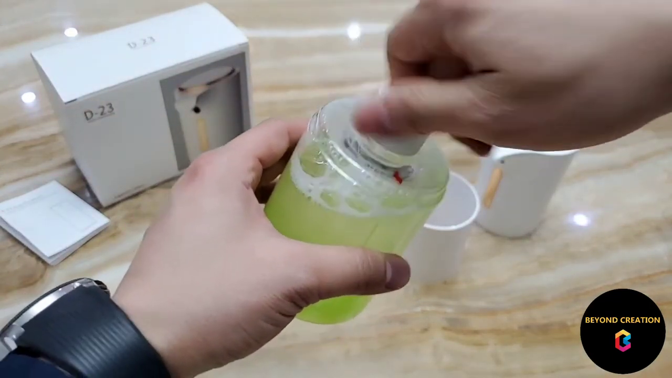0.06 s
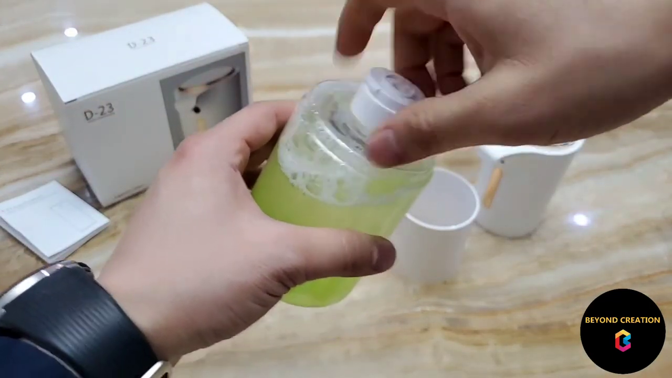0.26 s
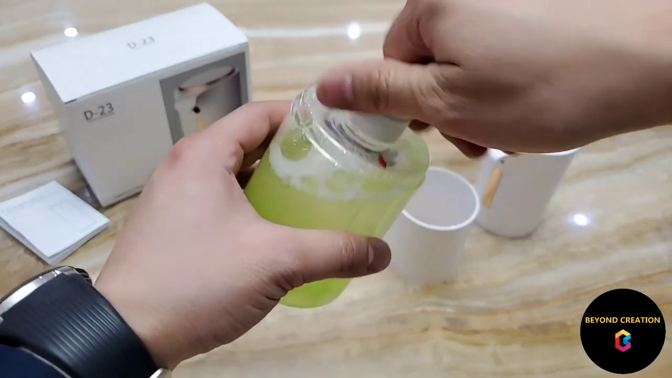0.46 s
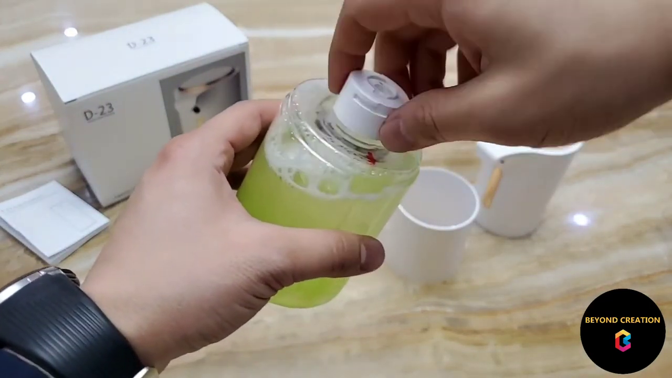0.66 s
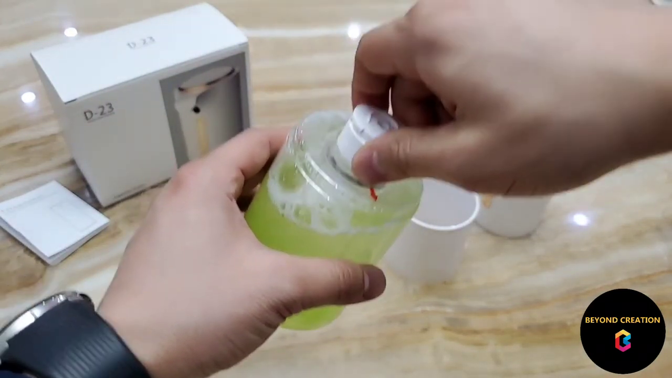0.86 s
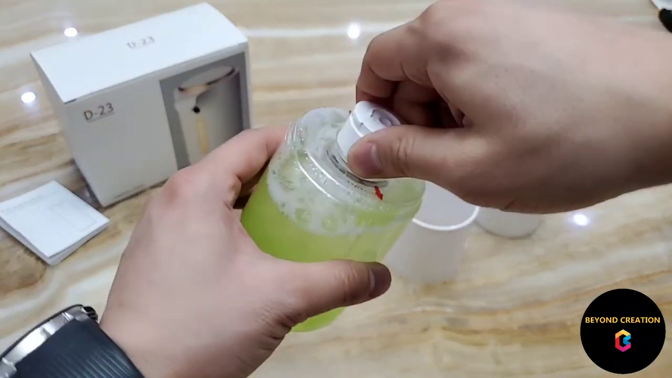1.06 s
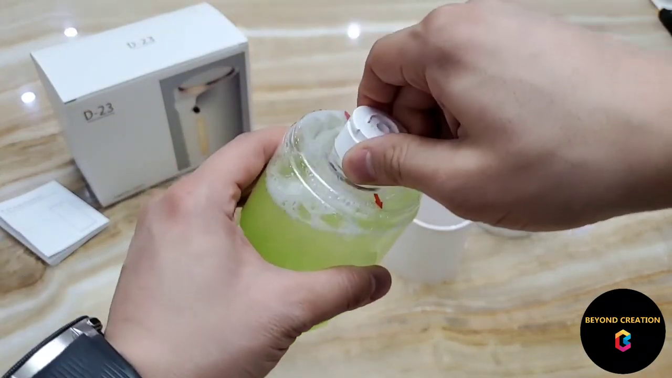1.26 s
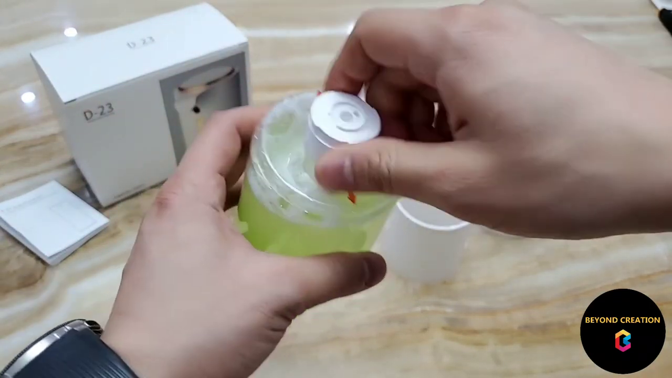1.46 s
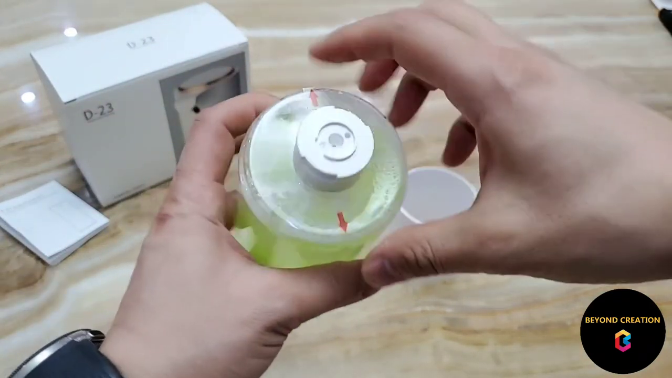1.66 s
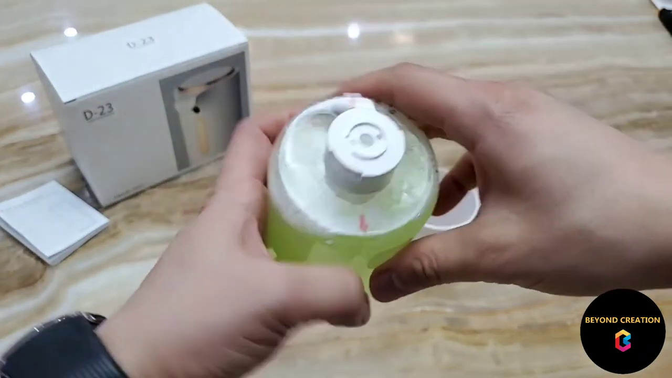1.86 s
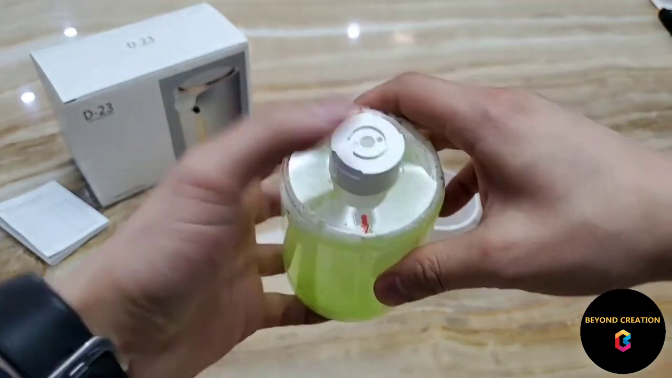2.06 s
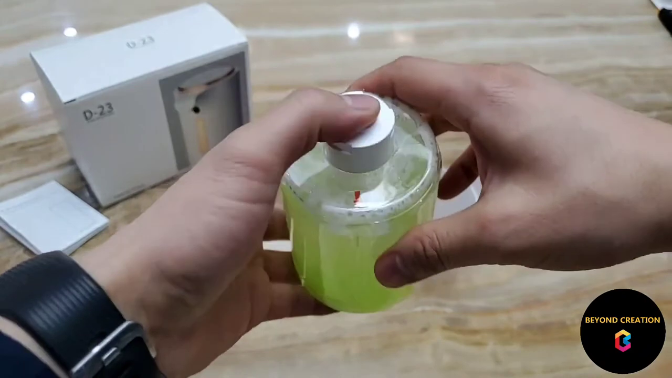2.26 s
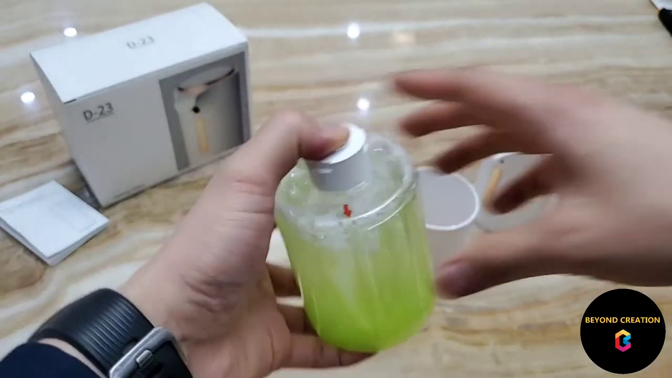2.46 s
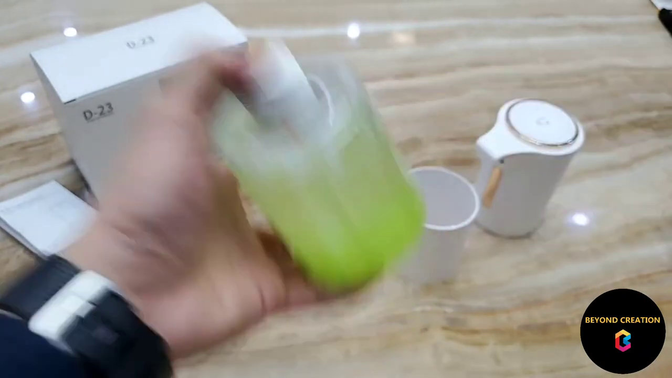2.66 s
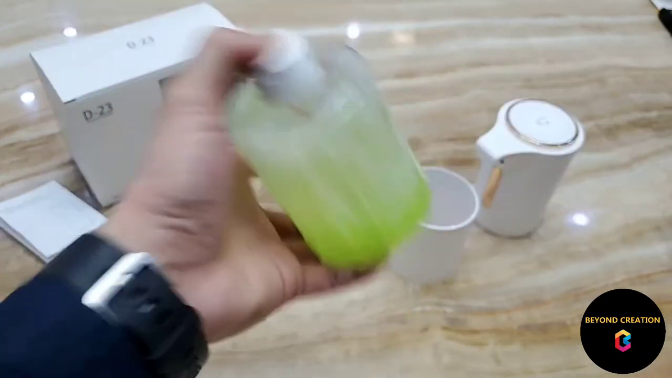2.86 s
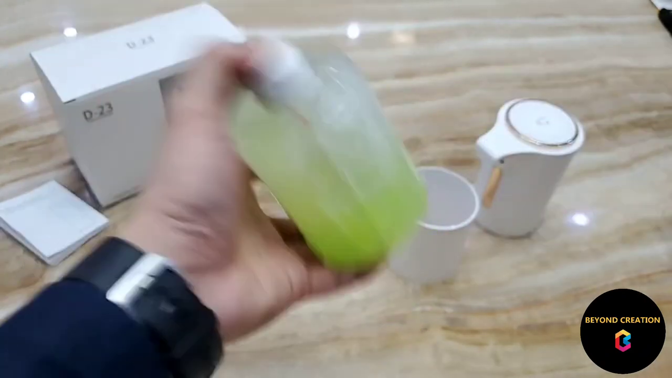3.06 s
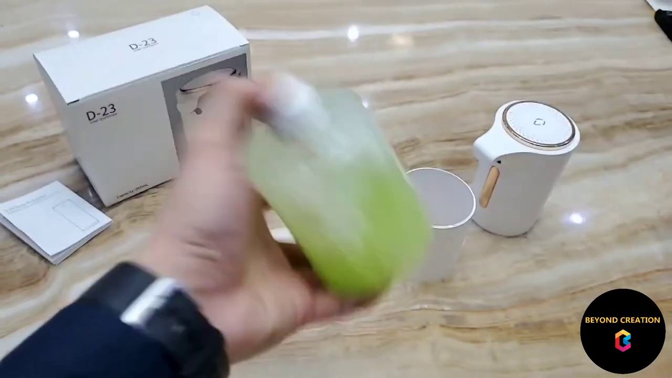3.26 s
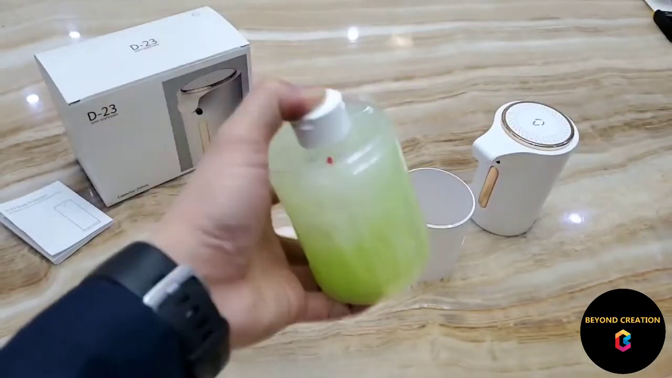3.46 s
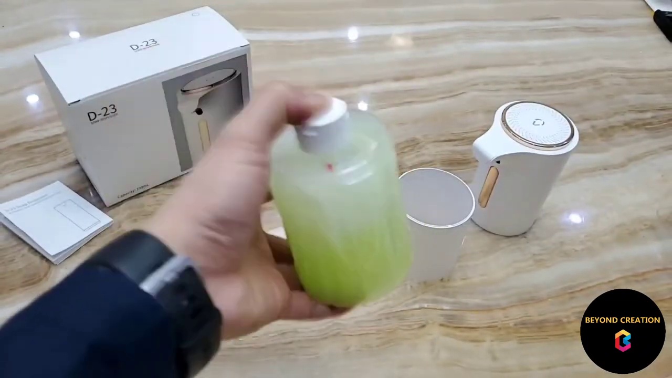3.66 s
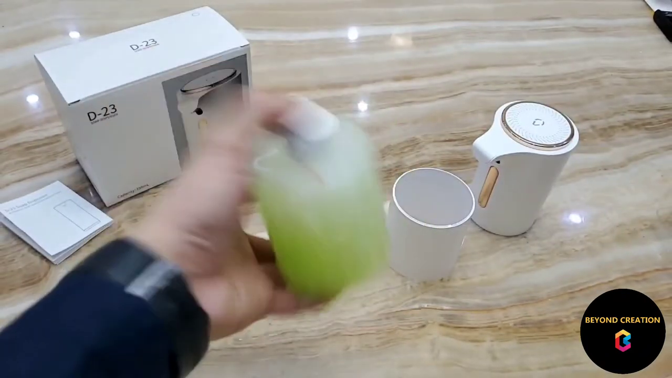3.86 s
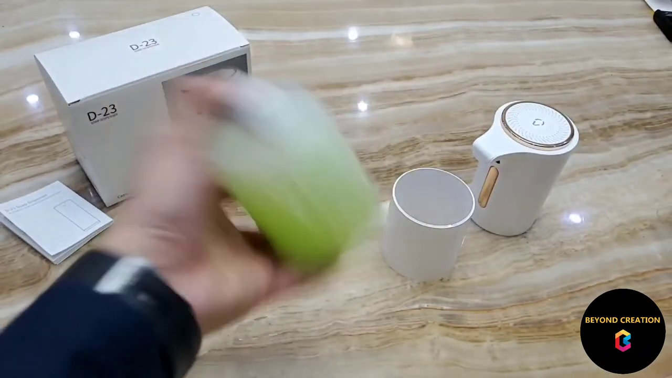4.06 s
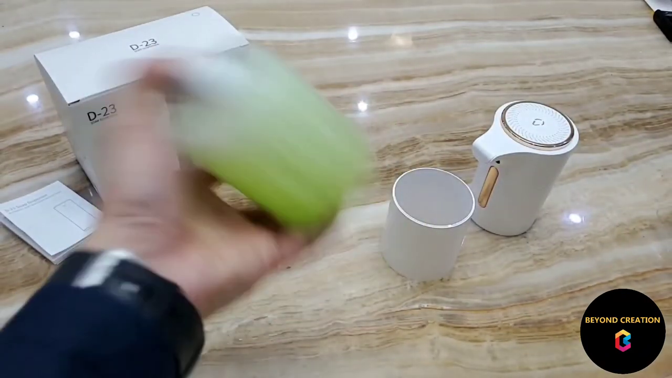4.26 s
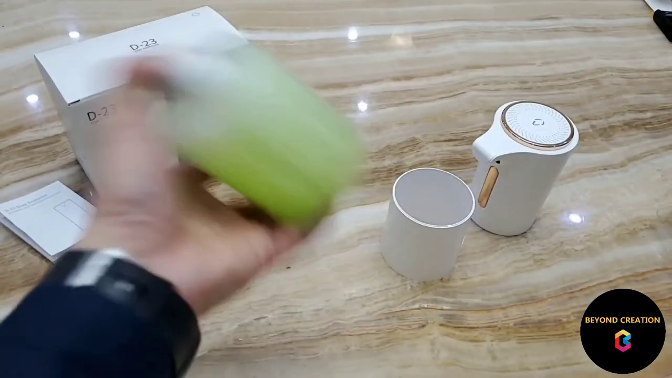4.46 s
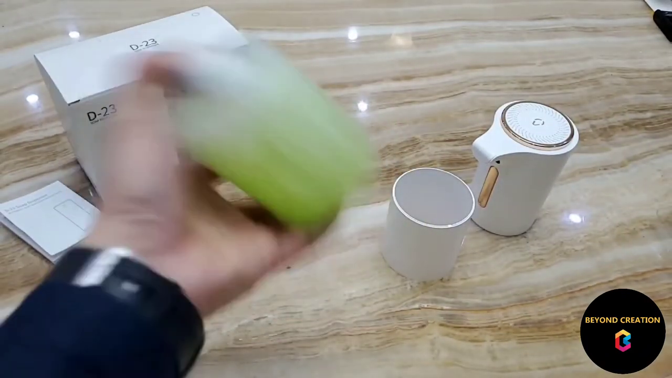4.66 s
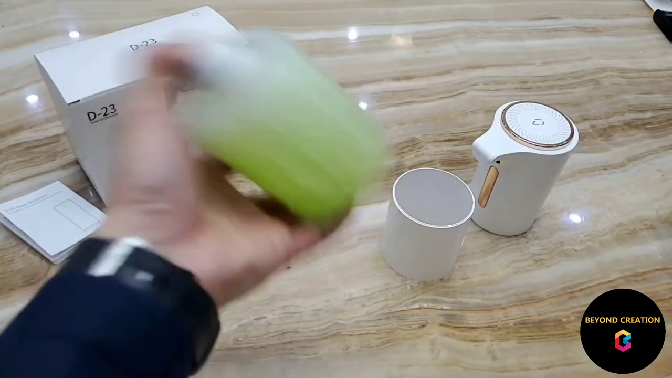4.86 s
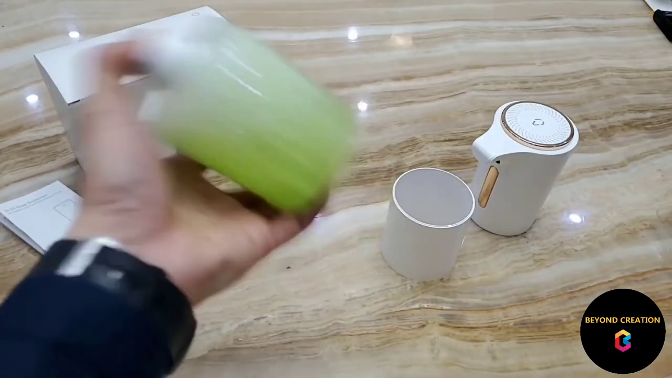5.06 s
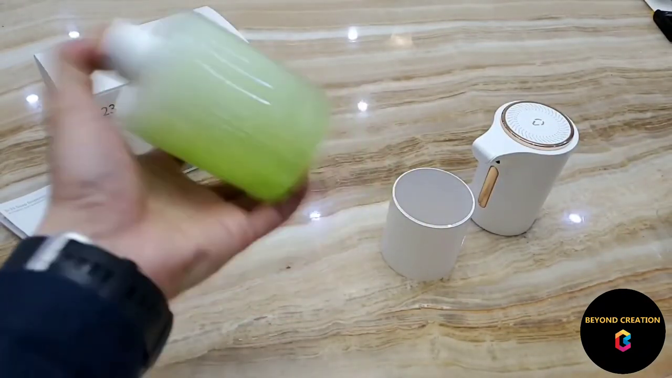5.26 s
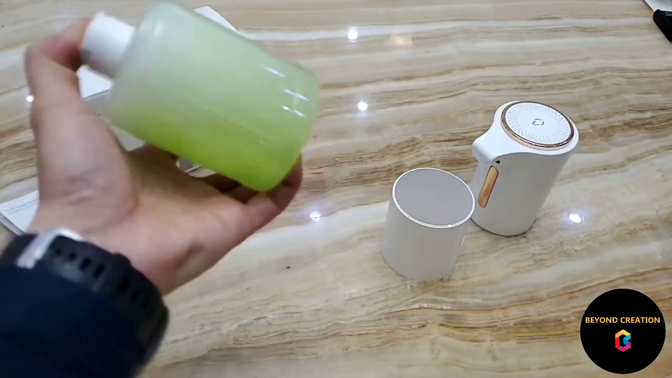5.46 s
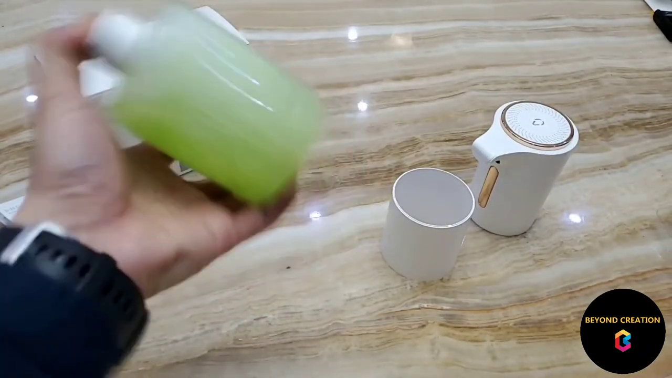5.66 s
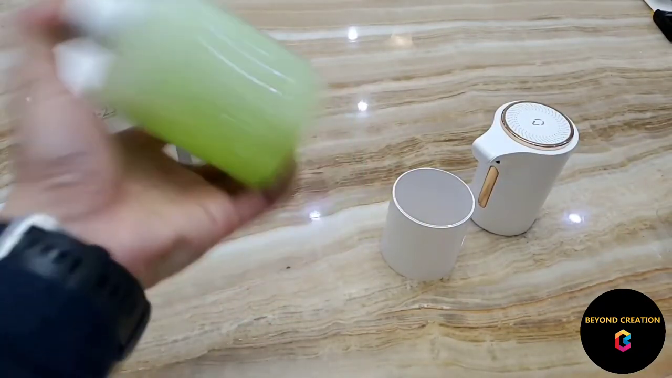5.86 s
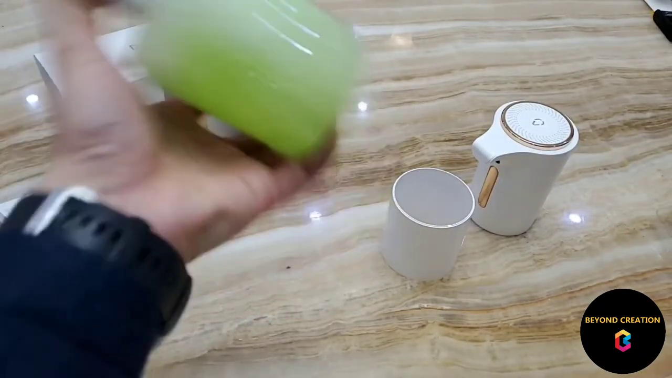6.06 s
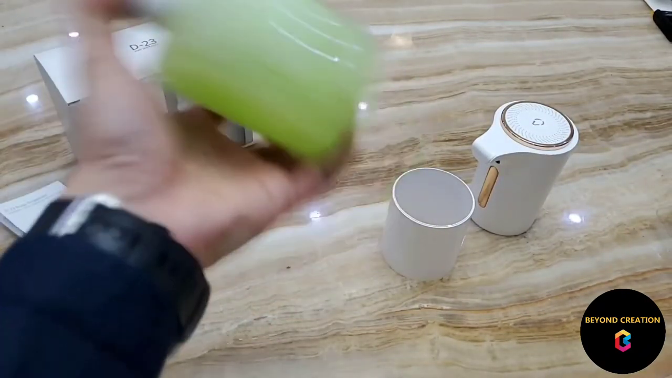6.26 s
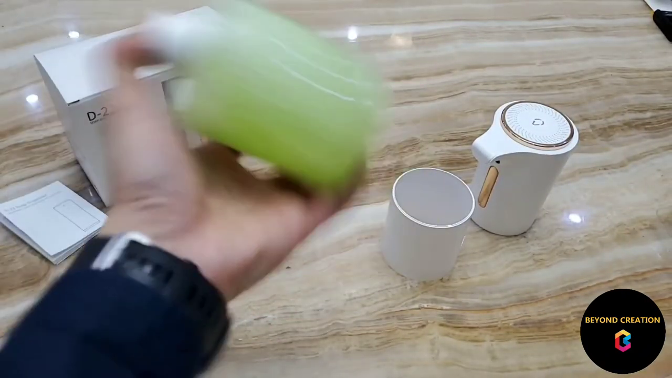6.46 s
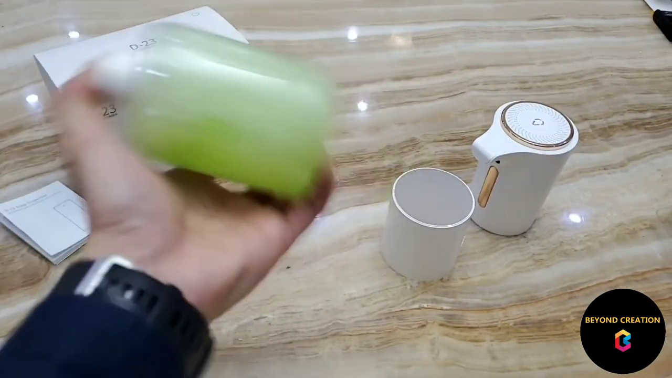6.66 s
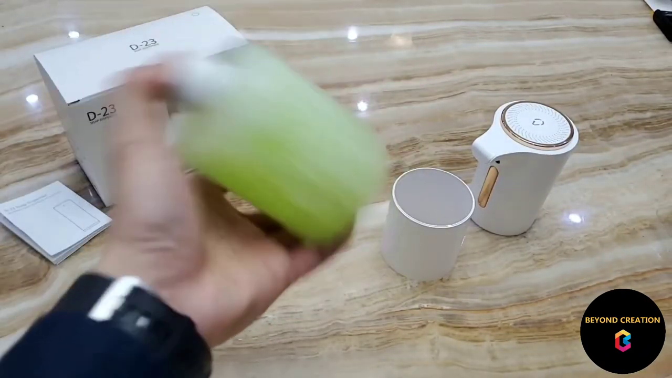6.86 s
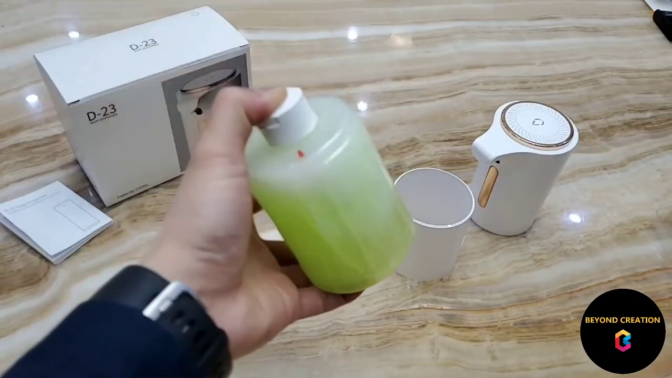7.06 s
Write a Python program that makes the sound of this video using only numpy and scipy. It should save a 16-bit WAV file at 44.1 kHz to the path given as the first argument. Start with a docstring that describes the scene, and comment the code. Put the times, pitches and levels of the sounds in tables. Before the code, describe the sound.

Quiet handling of a plastic bottle, a sharp snap, then rapid vigorous shaking with wet churning, dull thumps and sleeve swishes in a small room.

```python
"""Liquid soap in a capped plastic bottle is shaken hard, about five times a second, close to the microphone.
At the turns of the arm the soap churns as filtered noise, bubbles, and slaps the wall into damped swings.
Before that a hand knocks the bottle, the cap and wall click as damped modes, and plastic scrapes.
A sleeve swishes as bursts of noise, one for each reach and then one at every turn of the arm.
A small room answers with a short diffuse tail, over ventilation hum and thin microphone hiss."""
import sys
import numpy as np
from scipy import signal
from scipy.fft import rfft, irfft, next_fast_len
from scipy.io import wavfile
from scipy.ndimage import map_coordinates

SR = 44100
rng = np.random.default_rng(int(sys.argv[2]) if len(sys.argv) > 2 else 0)


def master(y):
    """Save y as 16-bit WAV."""
    cut = np.clip(np.atleast_2d(y).T, -1, 1)
    pcm = np.round(cut * 32767)  # scale
    wavfile.write(sys.argv[1], SR, pcm.astype(np.int16))


N = 313982  # length [samples]

# All levels are relative: the sources' own gains and the stereo placing follow.
# knocks of the hand on the bottle before the shaking, then hard slaps of the soap:
# (time [s], impact level [dB], pitch [Hz], sharp smack level [dB])
HARD_IMPACTS = [(2.81, -36.5, 600, -43.5), (2.831, -34, 277, -52), (2.857, -38.5, 262, -54),
                (3.03, -40.5, 307, -52), (3.241, -42, 354, -45.5), (4.243, -37.5, 135, -47),
                (4.382, -45, 437, -38), (4.891, -38.5, 193, -46.5), (4.985, -37, 196, -48),
                (5.172, -33.5, 150, -45), (5.373, -31, 151, -50), (5.56, -39, 390, -38.5),
                (5.76, -34.5, 310, -43), (5.947, -31.5, 343, -49), (6.131, -32.5, 530, -36.5),
                (6.341, -29, 347, -41.5), (6.401, -39, 348, -60), (6.538, -33.5, 350, -44),
                (6.732, -39, 342, -51)]
# snaps of the cap and the thin wall:
# (time [s], snap level [dB], ring pitch [Hz], crack level re snap [dB], dull knock level of the wall [dB])
SNAPS = [(0.1961, -64, 2510, -2, -46.5), (0.5699, -57, 3470, -13, -47), (0.612, -54, 3400, -13, -44.5),
         (0.8251, -56.5, 3450, -15, -41), (1.394, -64, 1790, -0.5, -51), (1.476, -37.5, 3910, -9.5, -39),
         (2.831, -38, 2380, -22, -55), (2.866, -46, 1750, -13, -48), (2.8964, -20.5, 2330, -26, -42),
         (2.9262, -36.5, 3380, -16, -45), (3.3098, -37, 2460, -20, -61), (3.5251, -33, 2230, -18, -42.5)]
# mass of liquid and air heaving to and fro: (time [s], level [dB])
HEAVE_LEVEL = [(2.72, -79), (2.85, -61), (3.22, -57), (3.38, -64), (3.62, -50), (4.22, -49.5),
               (4.75, -48.5), (5.6, -50.5), (6.5, -46), (6.77, -52.5), (6.96, -54.5), (7.1, -82)]


def amp(db):
    """Decibels are logarithmic: 20 dB is a factor of ten in amplitude."""
    return 10 ** (np.asarray(db) / 20)


def unit(x):
    """Normalisation: rms 1 makes the gain that follows the level."""
    return x / np.sqrt(np.mean(x ** 2) + 1e-20)


def along(points, hz):
    """Interpolate (frequency [Hz], value) points on a logarithmic frequency axis."""
    f, value = np.transpose(points)
    return np.interp(np.log(hz + 1), np.log(f + 1), value)


def level(rows):
    """Envelope: gain per sample from (time [s], level [dB]) rows, fading out beyond their ends."""
    s, db = np.transpose(rows)
    knots_s = np.r_[s[0] - .1, s, s[-1] + .1]
    return amp(np.interp(np.arange(N) / SR, knots_s, np.r_[-120, db, -120]))


def wobble(rate):
    """Band-limited fluctuation: a smooth curve through random knots, rate of them a second."""
    knots = rng.standard_normal(int(N * rate / SR) + 4)
    return map_coordinates(knots, [np.arange(N) * rate / SR])


def filtered(x, response):
    """Linear filtering: the spectrum of x is multiplied by a response of frequency."""
    size = next_fast_len(N + SR // 2)
    return irfft(rfft(x, size) * response(np.fft.rfftfreq(size, 1 / SR)), size)[..., :N]


def add(track, s, sound):
    """Superposition: a sound joins a track at time s [s]."""
    start = max(round(s * SR), 0)
    part = track[..., start:start + sound.shape[-1]]
    part += sound[..., :part.shape[-1]]


def rush(spectrum, grit_db=0):
    """Partly coherent stereo noise of rms 1; grit breaks it into millisecond grains."""
    # coherence of the two channels: (frequency [Hz], coherence [0-1])
    coherence = [(100, 0.84), (400, 0.85), (1000, 0.03), (2500, 0.21), (6000, 0), (12000, 0.1)]
    pair = rng.standard_normal((2, N)) * amp(grit_db * wobble(900))

    def mid_side_gains(hz):
        angle = np.arccos(np.clip(along(coherence, hz), -1, 1)) / 2
        return amp(along(spectrum, hz)) * [np.cos(angle), np.sin(angle)]
    mid, side = filtered(pair, mid_side_gains)
    return unit(np.array([mid + side, mid - side]))


def surges(times, levels_db, rise, fall, rest):
    """Powers of separate bursts add: each is a bell (rise, fall [s]) on a broader low skirt."""
    power = np.zeros(N)
    t = np.arange(-SR // 5, SR // 5) / SR
    skirt = rest * np.exp(-.5 * (t / 0.087) ** 2)
    for s, db in zip(times, levels_db):
        bell = np.exp(-.5 * (t / np.where(t < 0, rise, fall)) ** 2)
        add(power, s + t[0], amp(db) ** 2 * (bell + skirt))
    return np.sqrt(power)


def turns():
    """Reciprocating motion: time, direction, swish level and churn level of every turn of the arm."""
    # the arm's pace, even between these points: (time [s], turns made)
    pace = [(3.13, 0), (3.756, 6), (4.396, 13), (4.793, 17), (5.375, 23), (6.13, 31), (7.026, 40)]
    # vigour of the shaking:
    # (time [s], downswing swish level [dB], upswing swish level [dB], churn level [dB])
    effort = [(3.13, -57.5, -58, -61.5), (3.62, -48, -53, -54), (4.4, -46.5, -53, -54),
              (4.85, -48, -53, -51), (5.25, -47, -54.5, -55), (5.8, -48.5, -51, -51.5),
              (6.3, -47, -48, -47), (6.9, -50, -53, -53), (7.03, -58, -61, -68)]
    at, made = np.transpose(pace)
    number = np.arange(made[-1] + 1)
    s = np.interp(number, made, at)
    down = number % 2 == 1  # odd turns end a downswing
    when, *columns = np.transpose(effort)
    down_db, up_db, churn_db = [np.interp(s, when, column) for column in columns]
    return s, down, np.where(down, down_db, up_db), churn_db


def bubbles(rate, pitch_hz, spread, cycles, size_db):
    """Bubble resonance: a cloud of rms 1, each bubble rising in pitch while it loses 60 dB in some cycles."""
    draws = rng.random((int(rate * N / SR), 4))
    when, wide, angle, size = draws.T[:, :, None]
    # two uniform draws make one normal draw: pitches are log-normal
    normal = np.sqrt(-2 * np.log(1 - wide)) * np.cos(2 * np.pi * angle)
    hz = pitch_hz * np.exp(spread * normal)
    t = np.arange(SR // 50) / SR
    age = hz * t / cycles
    tone = np.sin(2 * np.pi * hz * t * (1 + 0.06 * np.minimum(age, 1)))
    ring = tone * amp(-60 * age) * (1 - np.exp(-2 * hz * t))
    ring = ring * amp(-size_db * np.log(1 - .98 * size))
    index = (when * N).astype(int) + np.arange(len(t))
    return unit(np.bincount(index.ravel(), ring.ravel(), minlength=N)[:N])


def churning():
    """Turbulence: noise and gulped bubbles swell at each turn, and around each hard impact."""
    # turbulent liquid: (frequency [Hz], spectral level [dB])
    churn_spectrum = [(100, -15.5), (200, 1.5), (290, -3), (400, -2), (560, -7), (800, -29.5), (1150, -16),
                      (1600, -19), (2500, -20), (6000, -68)]
    s, _, _, churn_db = turns()
    hit_s, _, _, smack_db = np.transpose(HARD_IMPACTS)
    at_turns = surges(s, churn_db, rise=0.034, fall=0.033, rest=0.1)
    # a brief swell rises into each impact and falls away after it
    at_impacts = surges(hit_s, smack_db - 11, rise=0.016, fall=0.008, rest=0)
    noise = amp(-4.0) * rush(churn_spectrum, grit_db=5.0) * amp(2.0 * wobble(70))
    gulps = amp(-6.5) * bubbles(rate=220, pitch_hz=440, spread=0.38, cycles=4.4, size_db=4.5)
    return np.hypot(at_turns, at_impacts) * (noise + gulps)


def froth():
    """Small bubbles resonate high: a dense cloud sounds at each throw of the liquid."""
    s, _, swish_db, _ = turns()
    throw = surges(s, swish_db, rise=0.0092, fall=0.021, rest=.04)
    return throw * amp(-17.5) * bubbles(rate=900, pitch_hz=1990, spread=0.395, cycles=10.0, size_db=0.0)


def drops():
    """Sparse random resonances: single drops also hit the wall between the turns."""
    s, _, _, churn_db = turns()
    drip = bubbles(rate=28, pitch_hz=1066, spread=0.24, cycles=11, size_db=2.5)
    return amp(-15.5) * level(np.c_[s, churn_db]) * drip


def heave():
    """Inertia of the moving mass: low, lumpy noise swells at the bottom of each downswing."""
    # heaving liquid and air: (frequency [Hz], spectral level [dB])
    swell_spectrum = [(24, -48), (40, -11), (60, -0.5), (88, 1), (125, -4), (200, -8.5), (320, -23.5),
                      (800, -46)]
    peak_db, lag_s = 5, 0.0054
    s, down, _, _ = turns()
    landing = surges(s[down] + lag_s, np.full(down.sum(), peak_db), rise=0.018, fall=0.013, rest=0.018)
    lumps = np.hypot(1, landing) * amp(1.1 * wobble(35))
    return amp(-3.0) * level(HEAVE_LEVEL) * lumps * rush(swell_spectrum)


def push(hz, cycles, rise=0.45, sag=0.13):
    """Damped oscillation: the soft wall, pushed in, swings briefly and sags in pitch; peak 1."""
    age = hz * np.arange(SR // 20) / SR  # [cycles], as are cycles (decay to 1/e) and rise
    envelope = (1 - np.exp(-(age / rise) ** 2)) * np.exp(-age / cycles)
    wave = envelope * np.sin(2 * np.pi * age * (1 + sag * np.exp(-age / 2)))
    return -wave / np.abs(wave).max()


def light_slaps():
    """Random impacts scaled by the churn: one slap of soap near each turn, in rows like the hard impacts."""
    over_churn_db, smack_re_slap_db, spread_db = 7, -9, 2
    typical_hz, spread_octaves, scatter_s = 262, 0.53, .028
    s, _, _, churn_db = turns()
    late, size, pitch, wet = rng.standard_normal((len(s), 4)).clip(-2, 2).T
    db = churn_db + over_churn_db + spread_db * size
    hz = typical_hz * 2 ** (spread_octaves * pitch)
    smack_db = db + smack_re_slap_db + spread_db * wet
    return np.c_[s + scatter_s * late, db, hz, smack_db]


def thumps(smack_hz, smack_s, jolt_hz, jolt_db):
    """Momentum transfer: a hand, then the soap, pushes the wall with a smack; strong, low impacts jolt it."""
    # the wall rings more briefly once foam damps it: (time [s], decay to 1/e [cycles])
    wall_ring = [(2.8, 1.3), (3.3, 0.41)]
    pushes, jolts, t = np.zeros(N), np.zeros(N), np.arange(SR // 20) / SR
    jolt = np.hanning(len(t)) * np.sin(2 * np.pi * jolt_hz * t)
    smack = np.exp(-t / smack_s) * np.sin(2 * np.pi * smack_hz * t)
    onset = 1 - np.exp(-t / 0.00041)
    for s, db, hz, smack_db in [*HARD_IMPACTS, *light_slaps()]:
        cycles = np.interp(s, *np.transpose(wall_ring))
        add(pushes, s - .0005, amp(db) * push(hz, cycles))
        add(jolts, s - .016, amp(db + jolt_db) * jolt_hz / hz * jolt)
        noise = signal.lfilter(*signal.iirpeak(smack_hz, 1.6, SR), rng.standard_normal(len(t)))
        burst = np.exp(-t / 0.012) * noise
        add(pushes, s + 0.00049, -amp(smack_db + 5) * onset * (smack + amp(0.5) * burst))
    swing = level(HEAVE_LEVEL)
    return pushes + jolts * swing / swing.max()


def knocks():
    """Impulse excitation: every snap also knocks the hollow bottle, damped by a tight grip."""
    track = np.zeros(N)
    for s, *_, knock_db in SNAPS:
        add(track, s + 0.00042, amp(knock_db) * push(hz=324, cycles=0.46))
    return track


def clicks(ring_t60, crack_t60, ring_db, crack_db):
    """Modal decay: plastic snaps ring in heavily damped modes, with a bright crack that excites the room."""
    modes = [(.6, -13), (.8, -9.5), (1, 1.5), (1.2, -10), (1.45, -9)]  # (multiple of ring pitch, level [dB])
    rings, cracks, t = np.zeros(N), np.zeros((2, N)), np.arange(SR // 25) / SR
    onset = 1 - np.exp(-t / 0.00023)
    for s, db, hz, bright_db, _ in SNAPS:
        ring = np.zeros(len(t))
        for k, (ratio, mode_db) in enumerate(modes):
            ring += amp(mode_db) * np.sin(2 * np.pi * hz * ratio * t + k * k)
        add(rings, s + 0.000968, ring * amp(db + ring_db - 60 * t / ring_t60) * onset)
        crack = amp(db + bright_db + crack_db - 60 * t / crack_t60) * rng.standard_normal((2, len(t)))
        add(cracks, s + 0.001072, signal.lfilter(*signal.butter(2, 0.73 * hz, "high", fs=SR), crack))
    # the highest treble is beamed straight at the microphones; the walls return a duller copy
    beamed = signal.lfilter(*signal.butter(1, 7000, "high", fs=SR), cracks)
    return rings + amp(2.5) * beamed + room(amp(-21.0) * rings + amp(-4.0) * cracks)


def scrapes_and_splashes(width_hz, cap_hz, cap_width_hz, cap_db):
    """Noise-excited resonance: short grainy bursts sound through a varying resonance and a fixed one of the cap."""
    # grainy noise, with the hollow of the cap near 3.5 kHz: (frequency [Hz], spectral level [dB])
    grain_spectrum = [(600, -5.5), (1200, -1), (1700, -1.5), (2500, -1.5), (3000, -4.5), (3450, 1.5),
                      (4200, -5), (5500, -9.5), (9000, -21), (15000, -29)]
    # the cap's thread scraping, a hand rubbing plastic,
    # then first bright splashes of thin soap against the cap:
    # (time [s], half length [s], grain level [dB], resonance level [dB], resonance pitch [Hz])
    bursts = [(0.004, 0.026, -57.5, -66, 1530), (0.069, 0.014, -68, -59.5, 1500),
              (0.089, 0.035, -62, -60.5, 1730), (0.415, 0.03, -69, -71.5, 1410),
              (0.497, 0.025, -69.5, -66.5, 2980), (0.754, 0.0076, -77, -66, 1280),
              (1.664, 0.016, -78, -69, 824), (2.837, .009, -62, -54.5, 1370),
              (2.915, 0.035, -52, -67, 1400), (3.036, 0.029, -58.5, -61.5, 770),
              (3.112, 0.023, -54.5, -65.5, 1800), (3.315, 0.029, -52, -62, 2160),
              (3.524, 0.022, -48.5, -54, 2280)]
    grains = rush(grain_spectrum, grit_db=4.0)
    track, t = np.zeros((2, N)), np.arange(N) / SR
    for s, half, grain_db, resonance_db, hz in bursts:
        near = np.abs(t - s) < 4 * half
        noise = rng.standard_normal(N)[near]
        varying = unit(signal.lfilter(*signal.iirpeak(hz, hz / width_hz, SR), noise))
        cap = unit(signal.lfilter(*signal.iirpeak(cap_hz, cap_hz / cap_width_hz, SR), noise))
        resonant = amp(resonance_db) * (varying + amp(cap_db) * cap)
        envelope = 1 / np.cosh(1.57 * (t[near] - s) / half)
        track[:, near] += envelope * (amp(grain_db) * grains[:, near] + resonant)
    return track


def sleeve():
    """Amplitude-modulated noise: cloth swishes in a burst for each reach, then at every turn of the arm."""
    # brushed cloth: (frequency [Hz], spectral level [dB])
    cloth_spectrum = [(300, -14), (700, 3.5), (1300, -6), (3500, 0.5), (5000, -2.5), (7500, -4.5),
                      (9500, -1.5), (11700, 1.5), (13500, -0.5), (15500, -1.5)]
    # the sleeve brushes as the hands change their grip: (time [s], level [dB], rise [s], fall [s])
    reaches = [(.1, -67, .05, 0.066), (.49, -69, 0.3, 0.21), (1.49, -66.5, 0.038, 0.14),
               (2.0, -66.5, 0.11, .08), (2.44, -64, .008, 0.36), (2.749, -55.5, 0.091, 0.31),
               (2.93, -71, .06, 0.13)]
    s, _, swish_db, _ = turns()
    shaking = surges(s - .002, swish_db, rise=0.013, fall=0.018, rest=0.086)
    t = np.arange(N) / SR
    power = np.zeros(N)
    for at, db, rise, fall in reaches:
        power += (amp(db) * np.exp(-np.abs((t - at) / np.where(t < at, rise, fall)))) ** 2
    reaching = np.sqrt(power) * amp(0.75 * wobble(30.16))
    envelope = amp(2.0) * shaking + amp(-0.5) * reaching
    return envelope * amp(0.89 * wobble(60)) * rush(cloth_spectrum, grit_db=0.96)


def room(x):
    """Reverberation: the walls answer with a short diffuse tail, different at each side."""
    # decay of the tail: (frequency [Hz], time to fall 60 dB [s])
    decay = [(150, 0.25), (1000, 0.3), (4000, 0.42), (12000, 0.26)]
    hz, t, z = signal.stft(rng.standard_normal((2, SR // 2)), SR, nperseg=256)
    tail = signal.istft(z * amp(-60 * t / along(decay, hz)[:, None]), SR, nperseg=256)[1]
    tail = tail / np.linalg.norm(tail[0])
    tail = np.pad(tail, ((0, 0), (SR // 250, 0)))  # 4 ms before the walls answer
    return signal.fftconvolve(x, tail, axes=1)[:, :N]


def placed(x, lag_ms):
    """Time and level differences: the right microphone, nearer the hands, hears them sooner and brighter."""
    # left minus right: (frequency [Hz], level difference [dB])
    balance = [(60, -6), (160, -5), (450, -3), (1200, -6), (3300, -6.5), (7500, -4), (9000, -14.5),
               (11500, -11.5), (15000, -9)]

    def gains(hz):
        left = amp(along(balance, hz))
        delay = np.exp(-2j * np.pi * hz * lag_ms / 1000)
        return np.array([left * delay, np.ones_like(left)]) * np.sqrt(2 / (1 + left ** 2))
    return filtered(x, gains)


def background():
    """Stationary noise: low ventilation hum in the room's resonances, and thin microphone hiss."""
    # ventilation hum: (frequency [Hz], spectral level [dB])
    hum_spectrum = [(20, -38), (45, -14.5), (65, -14), (90, 2), (140, -8.5), (210, 0), (290, -10),
                    (365, -1), (425, -1.5), (505, -21), (700, -26), (1400, -36.5), (5000, -39.5),
                    (10000, -50)]
    # microphone hiss: (frequency [Hz], spectral level [dB])
    hiss_spectrum = [(500, -51), (3000, -37), (7000, -17), (10000, -6.5), (11000, 4.5), (15500, 3.5)]
    hiss_gain = amp([[-75], [-67.5]])  # left, right
    return amp(-58.5) * rush(hum_spectrum) + hiss_gain * rush(hiss_spectrum)


def scene():
    """Superposition of bottle, arm and room."""
    soap = churning() + froth() + drops() + heave()
    impacts = thumps(smack_hz=980, smack_s=0.0015, jolt_hz=68.2, jolt_db=3.0)
    bursts = scrapes_and_splashes(width_hz=80, cap_hz=3560, cap_width_hz=260, cap_db=-3.5)
    bottle = soap + impacts + knocks() + bursts
    snaps = clicks(ring_t60=0.014, crack_t60=0.013, ring_db=-1, crack_db=8.5)
    arm = sleeve()
    walls = amp(-10.5) * room(bottle + arm)
    return placed(bottle + snaps + walls, lag_ms=0.17) + placed(arm, lag_ms=0.326) + background()


def record(dry):
    """Band limiting: nothing is kept from 15620 Hz upwards."""
    return filtered(dry, lambda hz: hz < 15620)


dry = scene()
out = record(dry)
master(out)
```